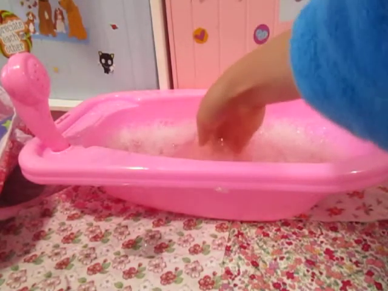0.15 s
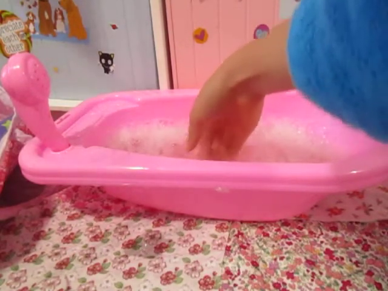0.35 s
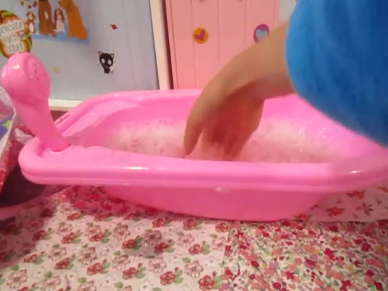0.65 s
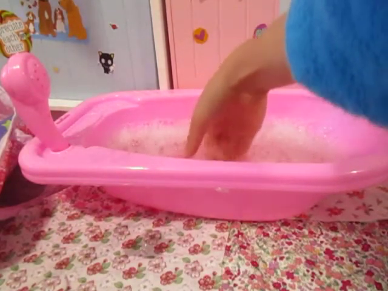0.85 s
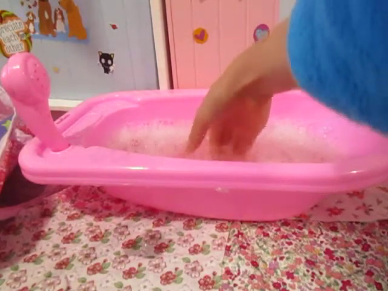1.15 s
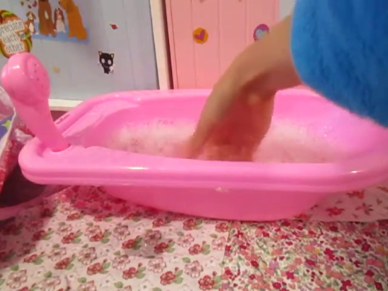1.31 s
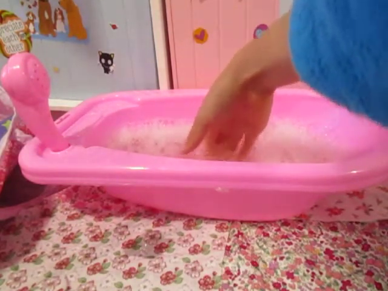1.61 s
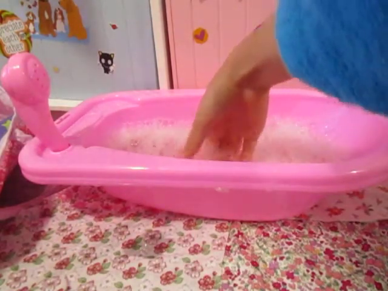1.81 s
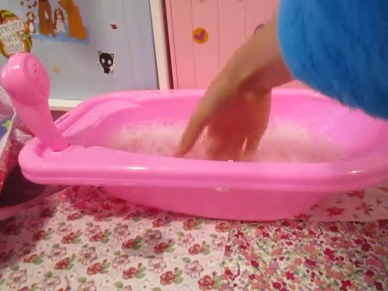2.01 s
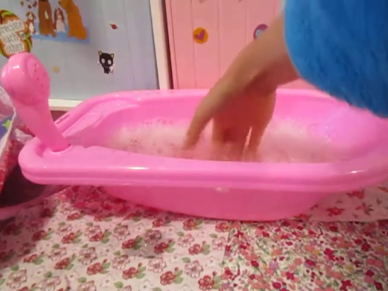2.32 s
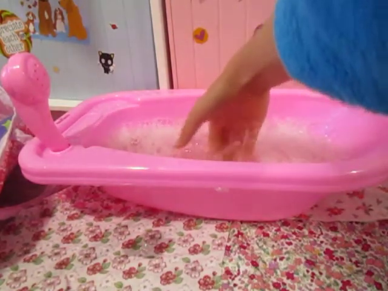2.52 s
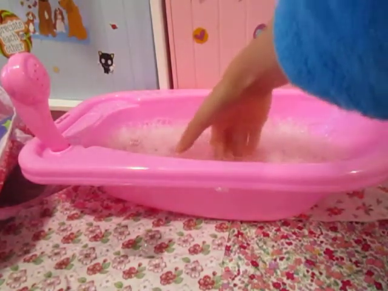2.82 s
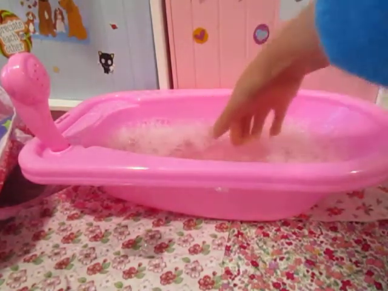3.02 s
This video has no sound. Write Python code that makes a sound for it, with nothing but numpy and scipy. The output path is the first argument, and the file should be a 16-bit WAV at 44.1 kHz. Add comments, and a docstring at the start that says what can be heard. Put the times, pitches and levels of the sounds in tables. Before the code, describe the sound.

Soapy water gurgles, plops and fizzes as fingers stir it in a little plastic tub

```python
"""In a small room, close by, a hand swishes through shallow soapy water in a small plastic tub.
Trapped air rings as short sines of rising pitch; squelches between the fingers are sine glides.
Slaps are clusters of damped bubbles plus noise spray, each with a low thump; foam is ticking noise,
big soap films crack, and the tub floor drums as band-passed noise. A low hum and faint air noise lie under it."""
import sys
import numpy as np
from scipy import signal
from scipy.fft import rfft, irfft
from scipy.io import wavfile
from scipy.ndimage import uniform_filter1d

SR = 44100
rng = np.random.default_rng(int(sys.argv[2]) if len(sys.argv) > 2 else 0)


def generate_wav(signal):
    """Clip the signal to [-1, 1] and save it as 16-bit WAV at the path in sys.argv[1]."""
    frames = np.transpose(np.atleast_2d(signal))
    scaled = np.clip(frames, -1, 1) * 32767
    pcm = np.round(scaled).astype(np.int16)
    wavfile.write(sys.argv[1], SR, pcm)


N = 138915  # samples

BUBBLE_RISE, ONSET_CYCLES, ONSET_S = 0.17, 0.5, 0.00051  # rise: share of the pitch; the onset terms add
SPRAY_LO_HZ, SPRAY_HI_HZ, DROPLET_FLICKER_DB = 2720, 10840, 28
SNAP_DB, POP_S = -24, 0.0021


def undb(db):
    """Decibels to gain."""
    return 10 ** (np.asarray(db) / 20)


def unit(x):
    """Scale to rms 1."""
    return x / np.sqrt(np.mean(x ** 2) + 1e-18)


def add(out, start_s, x):
    """Mix x in at start_s."""
    i = int(start_s * SR)
    out[i:i + len(x)] += x[:max(len(out) - i, 0)]


def band(x, lo_hz, hi_hz, order=2):
    """Butterworth band-pass."""
    sos = signal.butter(order, [lo_hz, hi_hz], "band", fs=SR, output="sos")
    return signal.sosfilt(sos, x)


def colour(x, points):
    """Shape the spectrum by (f/Hz, level/dB) points, interpolated over log frequency."""
    hz, db = np.array(points).T
    f = np.fft.rfftfreq(2 * N, 1 / SR)
    gain = undb(np.interp(np.log(f + 1), np.log(hz), db))
    return irfft(rfft(x, 2 * N) * gain)[:N]


def puff(length_s):
    """Envelope that swells quickly, then decays with time constant length_s; peak 1."""
    age = np.arange(SR // 5) / SR / length_s
    env = np.sqrt(age) * np.exp(-age)
    return env / env.max()


def hiss(length, count=9):
    """Fine droplets: noise bands, one per droplet size, flicker independently within ms; rms 1."""
    edges_hz = np.geomspace(1800, 16000, count + 1)
    noise, out = rng.standard_normal(length), np.zeros(length)
    step = 70  # samples between flicker values
    for lo_hz, hi_hz in zip(edges_hz, edges_hz[1:]):
        values = rng.uniform(-1, 1, length // step + 2)
        flicker = np.interp(np.arange(length) / step, np.arange(len(values)), values)
        out += band(noise, lo_hz, hi_hz) * undb(DROPLET_FLICKER_DB * flicker)
    return unit(band(out, SPRAY_LO_HZ, SPRAY_HI_HZ))


def bubble(hz, cycles, glide=1):
    """Ringing air: a sine swells fast, glides (up if glide > 0) and decays 40 dB over its cycles; peak about 1."""
    c = np.arange(int(1.5 * cycles * SR / hz) + 2) * hz / SR
    onset = 1 - np.exp(-(c / (ONSET_CYCLES + ONSET_S * hz)) ** 2)
    env = onset * np.exp(-np.log(100) * c / cycles)
    phase_cycles = c + glide * BUBBLE_RISE * c ** 2 / cycles / 2
    return env / env.max() * np.sin(2 * np.pi * phase_cycles)


def swarm(count, lo_hz, hi_hz, cycles, spread_db, scatter_s, size=4):
    """Random clutches of bubbles, mostly of middling pitch; many weak, a few strong; rms 1."""
    out = np.zeros(N)
    for k, (when, strength, *members) in enumerate(rng.random((count, 2 + 3 * size))):
        clutch_s = (k + 2 * when) / count * N / SR
        gain = undb(-spread_db * np.log(strength + .06))
        for late, u, v in np.reshape(members, (size, 3)):
            hz = lo_hz * (hi_hz / lo_hz) ** ((u + v) / 2)
            ring = bubble(hz, cycles * (.5 + u), glide=2 * v - .5)
            add(out, clutch_s + late * scatter_s, gain * np.sin(np.pi * late) * ring)
    return unit(out)


# the hand's stirring: t/s, gurgle level/dB, small-bubble and foam level/dB (relative)
STIRRING = [(0, -40, -38.5), (.17, -59, -50), (0.422, -41.5, -31), (.57, -47.5, -45.5), (.93, -40, -37.5),
            (1.171, -49.5, -39), (1.452, -35.5, -34.5), (1.55, -51, -46.5), (1.64, -34.5, -34.5),
            (1.87, -34.5, -31.5), (1.95, -44.5, -37), (2.17, -47, -35), (2.27, -31.5, -35),
            (2.41, -40.5, -32.5), (2.65, -34, -39), (2.85, -36, -35), (2.95, -59.5, -61)]


def stir(column):
    """Stirring strength over time as gain, interpolated in dB."""
    rows = np.array(STIRRING)
    return undb(np.interp(np.arange(N) / SR, rows[:, 0], rows[:, column]))


POP_SPREAD_DB = 10.5


def foam(count=1000):
    """Soap films burst at random, each a very short broad tick; rms 1."""
    pops = np.zeros(N)
    for when, strength in rng.random((count, 2)):
        pops[int(when * N)] += undb(-2 * POP_SPREAD_DB * np.log(strength + .015))  # power
    power = np.abs(signal.fftconvolve(pops, puff(POP_S) ** 2)[:N])
    return unit(hiss(N) * np.sqrt(power))


GURGLE_DB, FIZZ_DB, FOAM_DB, GULP_DB = -1.5, 0, -12.5, -48


def swish():
    """Gurgles, small bubbles and foam follow the stirring; deep gulps follow its square, so favour hard strokes."""
    gurgle_gain, fizz_gain = stir(column=1), stir(column=2)
    deep = swarm(count=130, lo_hz=191, hi_hz=664, cycles=11.3, spread_db=7, scatter_s=0.01565)
    gulps = unit(gurgle_gain ** 2 * deep)
    gurgle = swarm(count=240, lo_hz=513, hi_hz=1910, cycles=13.5, spread_db=3, scatter_s=0.00807)
    fizz = swarm(count=300, lo_hz=973, hi_hz=8220, cycles=13.6, spread_db=5.5, scatter_s=0.012, size=10)
    small = undb(FIZZ_DB) * fizz + undb(FOAM_DB) * foam()
    return undb(GULP_DB) * gulps + undb(GURGLE_DB) * gurgle_gain * gurgle + fizz_gain * small


# modes of the tub floor: lower edge f/Hz, width/Hz, level/dB (relative)
TUB_MODES = [(97, 44, 2.5), (129.4, 22.7, 1.5), (305.3, 39.5, -1.5)]
DRUM_DB = -41


def tub(water):
    """Moving water and slaps drum on the plastic floor: noise with their 200-700 Hz envelope drives its modes."""
    power = np.abs(uniform_filter1d(band(water, 200, 700) ** 2, SR // 50))
    push = rng.standard_normal(N) * np.sqrt(power)
    modes = sum(undb(db) * band(push, hz, hz + width_hz, order=1) for hz, width_hz, db in TUB_MODES)
    return undb(DRUM_DB) * unit(modes)


# steady hum: f/Hz, rms level/dB
HUM_TONES = [(46.5, -46.5), (101, -53.5)]
# spectrum of the room's air noise: f/Hz, level/dB (relative)
AIR_SPECTRUM = [(25, -17.5), (130, -9), (260, -19.5), (1200, -45), (4500, -35), (15000, -50)]
AIR_DB = -44.5


def background():
    """Low hum of steady sines plus faint coloured room noise."""
    t = np.arange(N) / SR
    air = unit(colour(rng.standard_normal(N), AIR_SPECTRUM))
    hum = sum(undb(db) * np.sqrt(2) * np.sin(2 * np.pi * hz * t) for hz, db in HUM_TONES)
    return undb(AIR_DB) * air + hum


# larger single bubbles: t/s, starting f/Hz, level/dB
PLOP_BUBBLES = [(.130, 1540, -20.5), (0.2367, 2380, -20), (0.286, 2490, -21.5), (.379, 3170, -15.5),
                (0.5271, 992, -17), (0.627, 2120, -21.5), (0.683, 4450, -17.5), (0.7455, 753, -26),
                (.763, 2700, -21), (1.0198, 2114, -14.5), (1.076, 2900, -16.5), (1.575, 2130, -20.5),
                (1.6145, 968, -17), (1.6575, 1420, -18), (1.682, 2420, -19), (1.802, 1512, -8),
                (1.8145, 2020, -13), (2.046, 3960, -8.5), (2.089, 1340, -18), (2.1903, 1120, -22),
                (2.220, 1003, -13.5), (2.2912, 496, -20), (2.3309, 1505, -12.5), (2.547, 1214, -13),
                (2.5468, 482, -18), (2.61, 531, -17), (2.7295, 2560, -14.5), (2.816, 1650, -16.5),
                (2.852, 780, -16), (2.958, 1316, -23.5)]
RING_CYCLES, SNAP_S = 18.3, 0.00053


def plops():
    """Larger air pockets ring cleanly; the surface snaps shut over each, louder over high ones."""
    out = np.zeros(N)
    for start_s, hz, db in PLOP_BUBBLES:
        add(out, start_s, undb(db) * bubble(hz, RING_CYCLES))
        snap = puff(SNAP_S)
        add(out, start_s, undb(db + SNAP_DB) * hz / SPRAY_LO_HZ * snap * hiss(len(snap)))
    return out


# slaps and splashes of the surface: t/s, level/dB, centre f/Hz, decay/s
SURFACE_SLAPS = [(0.198, -29, 4300, 0.0077), (0.269, -28.5, 1660, 0.0088), (0.355, -30, 4570, 0.012),
                 (0.5257, -13.5, 2940, 0.0027), (0.5992, -26, 2150, 0.003), (0.669, -31.5, 2920, 0.027),
                 (1.078, -34, 1770, 0.02), (1.17, -27.5, 5600, 0.0078), (1.258, -29.5, 1480, 0.013),
                 (1.4795, -23.5, 3300, 0.0077), (1.6128, -22, 1550, 0.0071), (1.646, -28, 2760, 0.019),
                 (1.801, -20, 1480, 0.0062), (2.016, -29, 3430, 0.018), (2.146, -25.5, 3350, 0.01),
                 (2.218, -25, 1230, 0.019), (2.3548, -20, 4300, .0035), (2.472, -25.5, 1110, 0.0077),
                 (2.5607, -21.5, 2710, 0.014), (2.605, -19.5, 2250, 0.019), (2.678, -23.5, 1610, 0.013),
                 (2.727, -25, 2260, 0.014), (2.8517, -16.5, 1610, 0.0042), (2.8935, -22.5, 6940, 0.0026)]
SLAP_OCTAVES, SPRAY_DB = 0.874, -7


def slaps(count=28, cycles=6):
    """Each slap throws a tight cluster of damped bubbles and fine spray; bright slaps spray more."""
    out = np.zeros(N)
    for start_s, db, centre_hz, length_s in SURFACE_SLAPS:
        shape = puff(length_s)
        burst = np.zeros(len(shape))
        sizes = (rng.permutation(count) + 1) / (count + 1)
        for k, (u, w) in enumerate(rng.random((count, 2))):
            late_s = -length_s * np.log(1 - (k + u) / (count + 1))
            octaves = SLAP_OCTAVES * np.log(sizes[k] / (1 - sizes[k])) / 2
            hz = min(centre_hz * 2 ** octaves, SR / 3)
            gain = np.exp(-late_s / length_s / 2) * np.sqrt(hz / centre_hz)
            add(burst, late_s, gain * bubble(hz, cycles * (.5 + w)))
        spray = undb(SPRAY_DB) * np.sqrt(centre_hz / SPRAY_LO_HZ) * unit(shape * hiss(len(shape)))
        density = np.sqrt(length_s * SR / len(burst))  # unit() averages over the whole buffer
        add(out, start_s, undb(db) * (unit(burst) + spray) * density)
    return out


THUMP_HZ, THUMP_DB, THUMP_CYCLES = 295, -1.5, 10.5


def thumps():
    """The hollow under each slap closes with a low, quickly damped note; dull slaps thump more."""
    out = np.zeros(N)
    for (start_s, db, centre_hz, _), size in zip(SURFACE_SLAPS, rng.random(len(SURFACE_SLAPS))):
        gain = undb(db + THUMP_DB) * np.sqrt(THUMP_HZ / centre_hz)
        add(out, start_s, gain * bubble(THUMP_HZ * 2 ** (size - .5), THUMP_CYCLES))
    return out


# big soap films bursting: t/s, level/dB
FILM_CRACKS = [(0.5289, -3), (0.8214, -16.5), (0.8459, -1.5), (1.0215, -11), (1.1592, -15), (2.577, -10),
               (2.8956, -42)]
CRACK_HZ = 5240


def cracks():
    """Big soap films burst: a pressure spike rings for a cycle or two, with a wisp of spray."""
    out = np.zeros(N)
    wisp = puff(POP_S)
    c = np.arange(len(wisp)) / SR * CRACK_HZ
    spike = np.exp(-c / 2) * np.sin(2 * np.pi * c)
    for start_s, db in FILM_CRACKS:
        add(out, start_s, undb(db) * (spike + undb(SNAP_DB) * wisp * hiss(len(wisp))))
    return out


# air squeezed between the fingers: t/s, final f/Hz, level/dB
FINGER_SQUELCHES = [(.8555, 2480, -18.5), (1.331, 1800, -21.5), (1.492, 2940, -19), (2.476, 3365, -13)]
SQUELCH_S, SQUELCH_OCTAVES = 0.01266, 0.695


def squelches():
    """Air squeezed between the fingers: the note climbs and swells, then breaks off."""
    out = np.zeros(N)
    age = np.linspace(0, 1, int(SQUELCH_S * SR))
    for start_s, final_hz, db in FINGER_SQUELCHES:
        hz = final_hz * 2 ** (SQUELCH_OCTAVES * (age - 1))
        phase = 2 * np.pi * np.cumsum(hz) / SR
        add(out, start_s, undb(db) * np.sin(np.pi * age ** 2) * np.sin(phase))
    return out


def echoes(x, delay_s, t60_s, lo_hz, hi_hz):
    """Reflections: x convolved with a delayed, decaying noise tail of unit energy."""
    t = np.arange(SR // 2) / SR
    decay = (t > delay_s) * np.exp(-np.log(1000) * t / t60_s)
    tail = band(rng.standard_normal(len(t)) * decay, lo_hz, hi_hz, order=1)
    return signal.fftconvolve(x, tail / np.linalg.norm(tail))[:N]


# colour of the tub's hollow: f/Hz, level/dB
HOLLOW_COLOUR = [(400, -8.5), (540, 3), (1000, 6.5), (1250, 0), (2200, 4), (3200, -1), (4700, 2),
                 (6200, -2.5)]
WALL_DB, WALL_T60_S = -13, 0.051
ROOM_DB, ROOM_T60_S, ROOM_TOP_HZ = -19.5, 0.41, 3580


def scene():
    """Water, reflections from the tub's walls, drumming floor, room echo and background."""
    direct = swish() + plops() + slaps() + thumps() + cracks() + squelches()
    water = direct + undb(WALL_DB) * echoes(direct, .001, WALL_T60_S, 400, 7000)
    near = colour(water, HOLLOW_COLOUR) + tub(water)
    room = echoes(near, .006, ROOM_T60_S, 120, ROOM_TOP_HZ)
    return (near + undb(ROOM_DB) * room + background())[None]


TOP_HZ = 15000


def record(dry):
    """The microphone clips at full scale, then a steep low-pass cuts the top."""
    lowpass = signal.ellip(8, .2, 80, TOP_HZ, fs=SR, output="sos")
    return signal.sosfilt(lowpass, np.clip(dry, -1, 1))


dry = scene()
out = record(dry)
generate_wav(out)
```